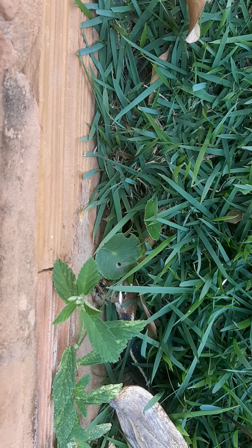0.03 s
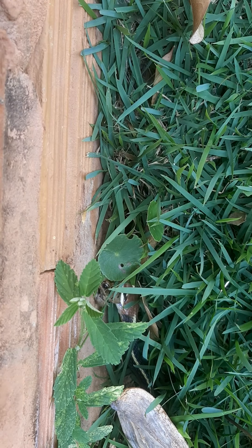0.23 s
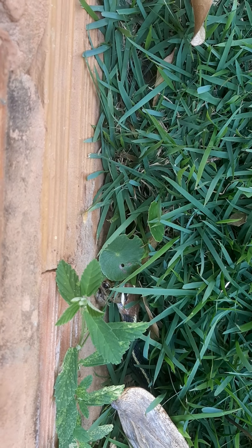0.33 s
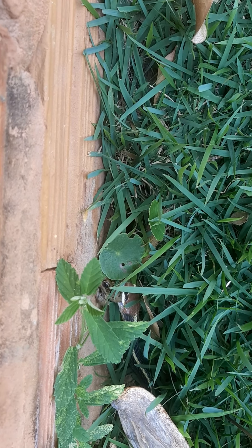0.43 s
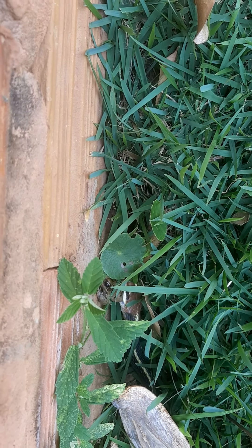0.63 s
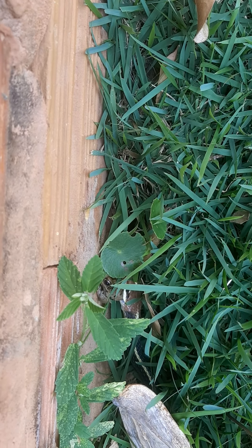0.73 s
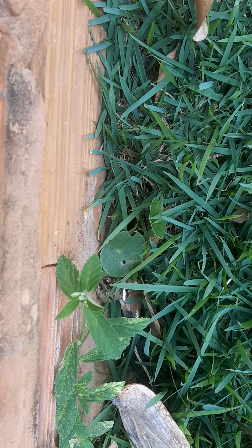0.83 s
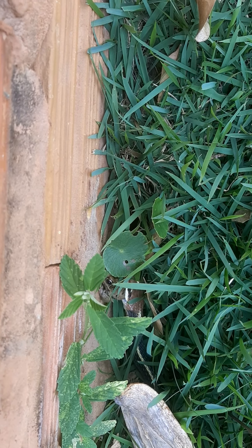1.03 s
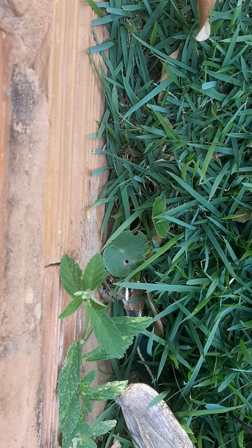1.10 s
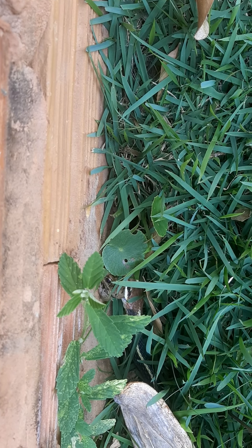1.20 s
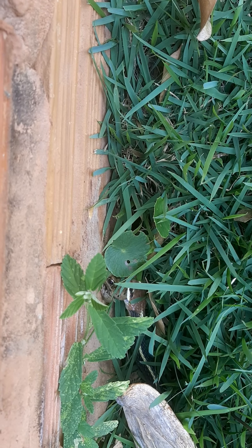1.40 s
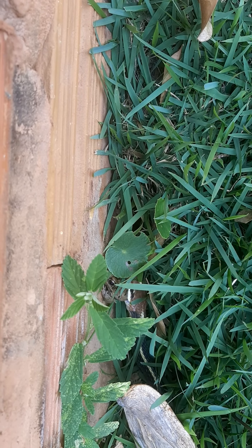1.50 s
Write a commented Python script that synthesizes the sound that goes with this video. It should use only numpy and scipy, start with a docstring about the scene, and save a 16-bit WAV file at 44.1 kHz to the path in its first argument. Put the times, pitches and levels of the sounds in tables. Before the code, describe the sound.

A frog gives one short, wailing distress cry over faint grass rustling.

```python
"""A frog's distress cry in the grass

A frog cries once: a slow creak speeds up into a bright wail, then sinks to a rough croak.
Its voice box makes a train of snaps that ring its throat and mouth, brighter as the mouth opens.
Boards and ground give a short echo. Grass rustles faintly, with one soft bump,
over a low outdoor rumble and a distant hum."""
import sys
import numpy as np
from scipy import signal
from scipy.fft import rfft, irfft, next_fast_len
from scipy.io import wavfile
from scipy.ndimage import map_coordinates

SR = 44100
rng = np.random.default_rng(int(sys.argv[2]) if len(sys.argv) > 2 else 0)


def master_out(mix):
    """Clip the mix to full scale and print it as 16-bit PCM to the path in sys.argv[1]."""
    frames = np.transpose(np.atleast_2d(mix))
    ceiling = np.clip(frames, -1, 1)
    pcm = np.round(ceiling * 32767).astype(np.int16)
    wavfile.write(sys.argv[1], SR, pcm)


N = 68355

# how strongly the mouth rings compared with the throat: t/s, level/dB
MOUTH = [(.128, 0.5), (.2, 1.2), (.225, 6.5), (.26, 10.5), (.296, 12), (.33, 10.5), (.356, 7), (.374, -4),
         (.392, -14.5), (.42, -10.5), (.46, -13.5)]
SHUT_DB, OPEN_DB = -10.5, 10.5  # that level with the mouth nearly shut and wide open


def frog(size=1024):
    """Each snap of the voice box rings throat and mouth; a wider mouth rings brighter and longer."""
    pitch = [(.128, 128.2), (.19, 121.2), (.218, 134.5), (.24, 155.5), (.27, 249.9), (.295, 298),
             (.312, 334.4), (.328, 341.6), (.36, 294.5), (.385, 273.8), (.41, 331.5), (.425, 196.9),
             (.44, 160.3), (.45, 61.2), (.46, 75.3)]  # snaps per second, from the cry's start to its end: t/s, f/Hz
    loudness = [(.128, -59.5), (0.145, -55.5), (0.199, -52), (0.224, -48), (0.258, -42), (.296, -38),
                (.326, -33.5), (.356, -35.5), (0.38, -40), (0.426, -44.5), (.44, -53.5), (.46, -58)]  # strength of the throat's ring: t/s, relative level/dB
    slides = [(.13, 0.99), (.24, .985), (.31, 1.058), (.35, 0.97), (.375, .93), (.41, 1)]  # how the mouth's ringing tones shift: t/s, ratio to their usual pitch
    colour = [(150, -35, -36.5), (563, -24.5, -27), (1000, -12, -9), (1400, -3.5, -4.5), (1699, 1, -2),
              (2050, 3, 1.5), (2350, -2, -9.5), (2810, 6, -7), (3390, 12, -12.5), (3800, 5, -14),
              (4030, -3.5, -19), (5000, -20, -34.5), (5700, -26.5, -30.5), (6600, -20.5, -33),
              (7710, -21, -29), (8700, -28, -40.5), (10300, -30, -40.5), (11550, -17.5, -31),
              (12700, -17.5, -22.5), (13800, -28.5, -36), (15500, -24.5, -36.5)]  # tone of one snap: f/Hz, mouth wide level/dB, nearly shut level/dB
    pan = [(500, -3), (1100, -9.5), (1450, 0.5), (2000, 10), (2400, -9), (2800, -2), (3400, -12.5),
           (4200, -8), (5500, 4), (6500, -4), (7400, 4.5), (9000, -5), (10200, -1), (11700, -13.5),
           (12500, -10.5), (15000, -15.5)]  # where the cry is heard: f/Hz, left minus right/dB
    rasp_colour = [(600, -9), (1500, -1.5), (3800, 5), (6000, 5), (14000, 5.5)]  # tone of the air noise on each snap: f/Hz, level/dB
    gain_db, rasp_decay_s = 12.5, .002
    break_s, break_fade_s = .398, .018  # the voice turns rough
    throat_hz, mouth_hz = 2000, 2984  # tones stay put below the first, slide fully above the second
    slack_hz, slack_db = 2593, -15  # a slack voice box snaps softly and loses treble

    # one snap for each cycle of the pitch
    pitch_times, rates = np.transpose(pitch)
    t = np.arange(pitch_times[0], pitch_times[-1], 1 / SR)
    cycles = np.cumsum(np.interp(t, pitch_times, rates)) / SR
    snap_times = np.interp(np.arange(.08, cycles[-1]), cycles, t)

    hz, age = np.fft.rfftfreq(size, 1 / SR), np.arange(size) / SR
    slide_share = np.interp(hz, [throat_hz, mouth_hz], [0, 1])
    treble = hz ** 4 / (hz ** 4 + slack_hz ** 4)
    out = np.zeros((2, N + size))
    for s in snap_times:
        rate, loud_db, mouth_db, slide = (at_time(c, s) for c in (pitch, loudness, MOUTH, slides))
        opening = (mouth_db - SHUT_DB) / (OPEN_DB - SHUT_DB)
        shifted_hz = hz / slide ** slide_share
        colour_db = opening * at_hz(colour, shifted_hz) + (1 - opening) * at_hz(colour, shifted_hz, 2)
        ring = resonator(amp(colour_db) * sides(at_hz(pan, hz)))

        # a rough voice is less even in timing and has more air noise
        rough = np.clip((s - break_s) / break_fade_s, 0, 1)
        slip_s = rng.standard_normal() * (.00061 + rough * .05) / rate
        flicker_db = rng.standard_normal() * (-.36 + rough * .5)
        rasp = amp(-36 + rough * 13.5) * rng.standard_normal(size) * np.exp(-age / rasp_decay_s)
        breath = rfft(rasp) * amp(at_hz(rasp_colour, hz))

        start, fraction = divmod((s + slip_s) * SR, 1)
        delay = np.exp(-2j * np.pi * hz * fraction / SR)  # places the snap between two samples
        snap = resonator(amp(rough * slack_db * treble)) * delay
        gain = amp(gain_db + loud_db + flicker_db) * np.sqrt(SR / rate)
        out[:, int(start):int(start) + size] += gain * irfft(ring * (snap + breath))
    return out[:, :N]


def yard_echo(sound, gap_s=.0011):
    """Boards and ground scatter the sound back as a short, blurred echo."""
    echoes = [(500, .14, -3), (2000, .12, -4), (3400, 0.04, -7.5), (4200, .17, -4.5), (6000, 0.14, 0.5),
              (14000, 0.064, -1.5)]  # the echo at each pitch: f/Hz, time to fade by 60 dB/s, level/dB
    hz, t, noise = signal.stft(rng.standard_normal((2, SR // 4)), SR, nperseg=128)
    fade = amp(-60 * t / at_hz(echoes, hz)[:, None])
    tail = signal.istft(noise * fade, SR, nperseg=128)[1]
    tail *= np.arange(tail.shape[1]) / SR > gap_s
    tail /= np.linalg.norm(tail[0])
    echo = signal.fftconvolve(sound.mean(0)[None], tail, axes=1)[:, :N]
    return filtered(echo, lambda hz: amp(at_hz(echoes, hz, 2)))


def grass(rustle_gain_db=-13, width_octaves=.6):
    """Blades brush past each other in short grainy strokes, each with its own pitch; one soft bump."""
    rustles = [(.175, -55, -9, 7300), (0.496, -57, -10.5, 10680), (0.526, -58, -8.5, 7010),
               (.642, -57, -7, 5800), (.679, -55.5, -7, 5300), (.737, -57.5, 0.5, 11000),
               (.806, -68.5, -16, 7000), (.88, -60.5, -5, 13000), (.967, -59, -8, 5500),
               (.985, -62, 1.5, 5500), (1.279, -58.5, -4.5, 4450), (1.305, -60.5, -5.5, 3800),
               (1.426, -64, -6, 5276), (1.497, -56, -7, 5700)]  # strokes: t/s, relative peak/dB, left minus right/dB, centre f/Hz
    # tone of the rustle, with the recorder's dip at 8-10 kHz: f/Hz, level/dB
    rustle_colour = [(300, -4.5), (1000, -6), (2500, -3.5), (4000, -9.5), (5200, -5.5), (7600, -11),
                     (8500, -22), (10000, -16), (12000, -9), (15500, -11)]
    bump_colour = [(120, -10.5), (280, 2), (480, -10), (700, -12), (2000, -31.5)]  # dull tone of the bump: f/Hz, level/dB
    brush = stereo_noise(rustle_colour) * amp(3 * wobble(670))  # fast flicker makes it grainy
    out = amp(-62) * swell(.166, fall_s=.03) * stereo_noise(bump_colour)
    size = next_fast_len(N)
    hz, spectrum = np.fft.rfftfreq(size, 1 / SR), rfft(brush, size)
    for s, peak_db, pan_db, centre_hz in rustles:
        octaves = np.log2((hz + 1) / centre_hz)
        band = amp(-8.5) + np.exp(-(octaves / width_octaves) ** 2)
        blade = unit(irfft(spectrum * band, size)[:, :N])
        out += amp(rustle_gain_db + peak_db) * sides(pan_db) * swell(s, fall_s=.018) * blade
    return out


def outdoors():
    """A low rumble, a faint background wash and hiss, and a wavering hum."""
    rumble_colour = [(20, -21), (35, -14), (52, 1), (105, -0.5), (130, -7), (160, -9.5), (225, -11),
                     (280, -16.5), (350, -28.5), (600, -32.5), (2000, -84.5)]  # tone of the rumble: f/Hz, level/dB
    # tone of the faint wash and hiss, with the recorder's dip at 8-10 kHz: f/Hz, level/dB
    wash_colour = [(150, -22), (400, -7), (700, -9), (1000, -3), (1350, -0.5), (1560, 6), (1800, -6.5),
                   (2100, -3.5), (2500, -15), (5200, -17), (7700, -21.5), (8500, -34.5), (9800, -26.5),
                   (11500, -18.5), (15500, -18.5)]
    hum_tones = [(177.6, -66), (220.7, -75), (446.8, -88.5)]  # the distant hum: f/Hz, level/dB
    pan = [(60, -1), (380, -1.5), (700, -4), (1400, -2), (4400, -4.5), (8000, -8.5), (15000, -1)]  # where the background is heard: f/Hz, left minus right/dB
    t = np.arange(N) / SR
    rumble = amp(-58 + .4 * wobble(4.5)) * stereo_noise(rumble_colour)
    wash = amp(-68 + .7 * wobble(6)) * stereo_noise(wash_colour)
    hum = np.zeros(N)
    for hz, db in hum_tones:
        gain = np.sqrt(2) * amp(db + 1.4 * wobble(3.7))
        hum += gain * np.sin(2 * np.pi * hz * t + .4 * wobble(7))
    return filtered(rumble + wash + hum, lambda hz: sides(at_hz(pan, hz)))


def stereo_noise(colour):
    """Noise of a given tone, alike on both sides in the bass and unrelated in the treble."""
    likeness = [(60, 0.9), (130, 0.93), (290, 0.89), (640, 0.09), (1410, -0.5), (3100, 0.16), (6820, 0.01),
                (15000, -0.01)]  # how well left and right match: f/Hz, likeness (1 same, -1 opposite)

    def response(hz):
        angle = np.arccos(np.clip(at_hz(likeness, hz), -1, 1)) / 2
        return amp(at_hz(colour, hz)) * [np.cos(angle), np.sin(angle)]

    mid, side = filtered(rng.standard_normal((2, N)), response)
    return unit(np.array([mid + side, mid - side]))


def resonator(gain):
    """The response of something that rings only after it is struck, from its gain at each frequency."""
    cepstrum = irfft(np.log(np.maximum(gain, 1e-6)))  # the log gains, laid out in time
    half = cepstrum.shape[-1] // 2
    forward_only = np.r_[1, np.full(half - 1, 2), 1, np.zeros(half - 1)]
    return np.exp(rfft(cepstrum * forward_only))


def swell(peak_s, fall_s, rise_s=.006):
    """A level that rises to 1 and dies away."""
    t = np.arange(N) / SR
    return np.exp(-np.maximum((peak_s - t) / rise_s, (t - peak_s) / fall_s))


def wobble(rate):
    """A smooth curve through `rate` random values a second."""
    values = rng.standard_normal(int(N * rate / SR) + 4)
    return map_coordinates(values, [np.arange(N) * rate / SR])


def filtered(x, response):
    """Scale each frequency in x by response(hz)."""
    size = next_fast_len(N + SR // 2)
    return irfft(rfft(x, size) * response(np.fft.rfftfreq(size, 1 / SR)), size)[..., :N]


def at_time(table, s):
    """Read a table at s seconds."""
    return np.interp(s, *np.transpose(table))


def at_hz(table, hz, column=1):
    """Read a table's column at hz, with octaves evenly spaced."""
    rows = np.array(table, float)
    return np.interp(np.log(hz + 1), np.log(rows[:, 0] + 1), rows[:, column])


def sides(db):
    """Left and right gains, with the left louder by db."""
    return amp(np.array([[.5], [-.5]]) * db)


def amp(db):
    """Decibels to gain."""
    return 10 ** (np.asarray(db) / 20)


def unit(x):
    """Scale to an average (rms) level of 1."""
    return x / np.sqrt(np.mean(x ** 2) + 1e-20)


def scene(beam_db=7):
    """The frog in the grass; its open mouth aims the wail forward, so less of it reaches the boards."""
    around = outdoors() + grass()
    cry = frog()
    beaming = np.clip(at_time(MOUTH, np.arange(N) / SR) / OPEN_DB, 0, 1)
    return around + cry + yard_echo(cry * amp(-beam_db * beaming))


def record(dry, top_hz=15800):
    """Cut away the very highest treble."""
    return filtered(dry, lambda hz: hz < top_hz)


dry = scene()
out = record(dry)
master_out(out)
```